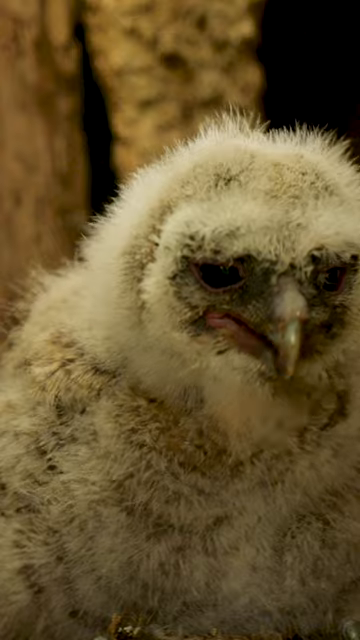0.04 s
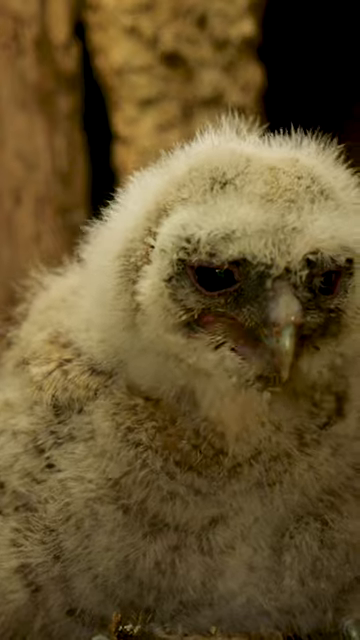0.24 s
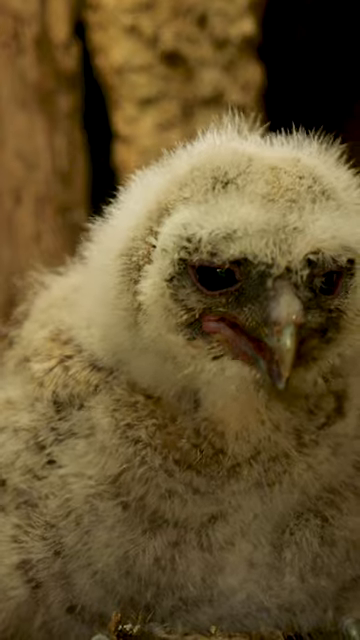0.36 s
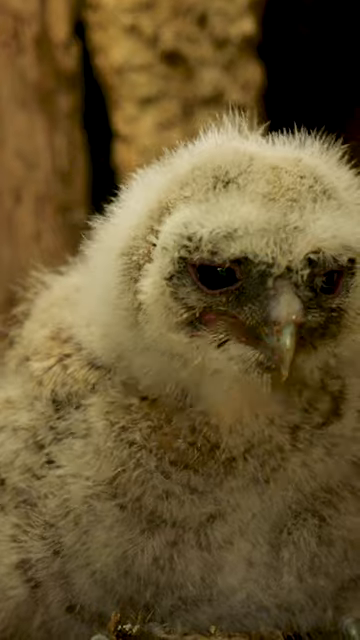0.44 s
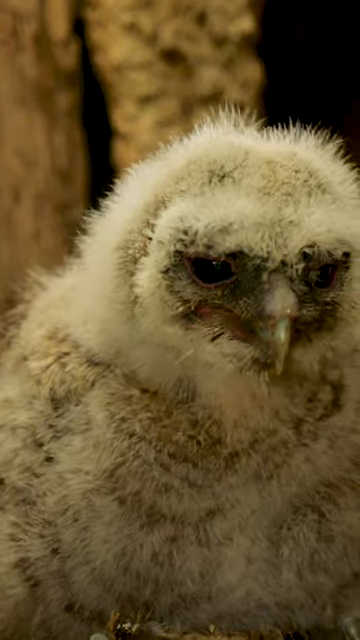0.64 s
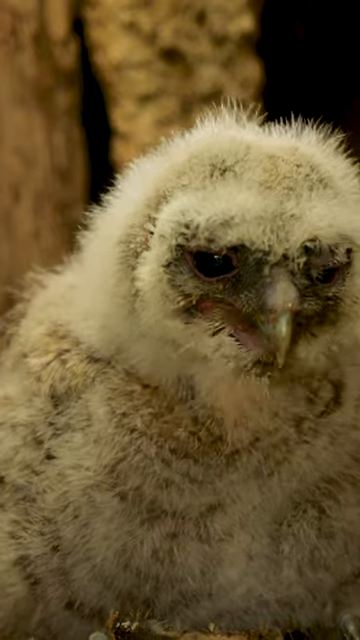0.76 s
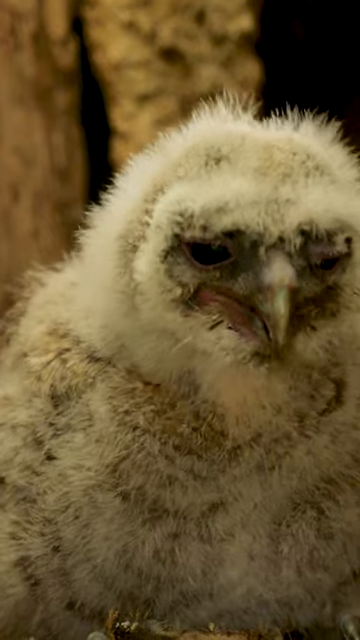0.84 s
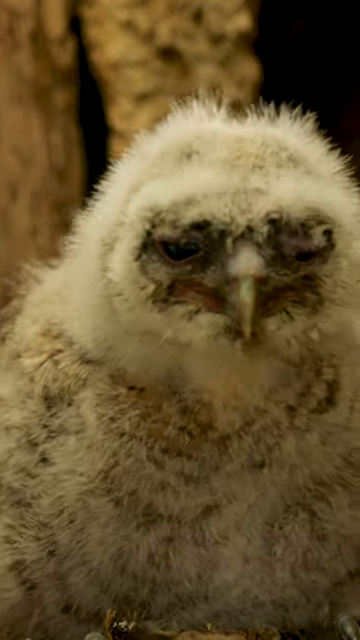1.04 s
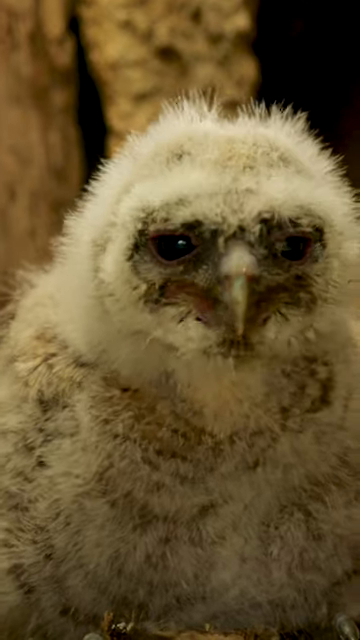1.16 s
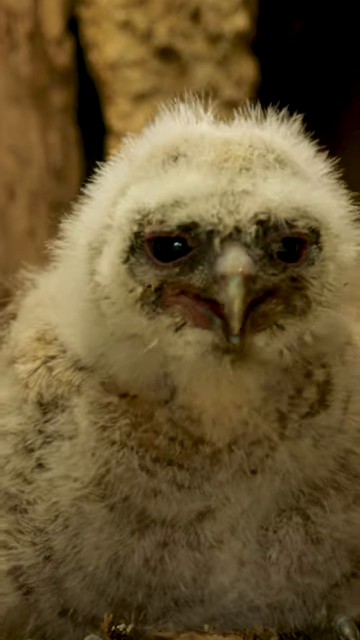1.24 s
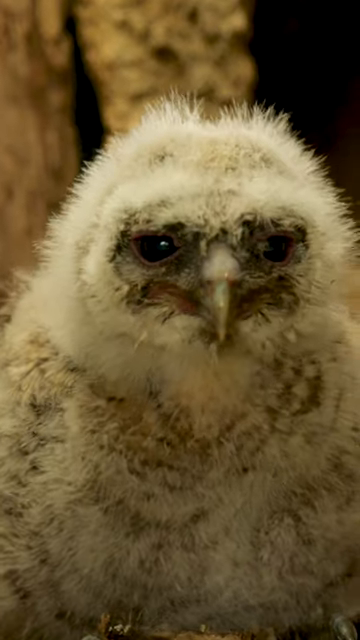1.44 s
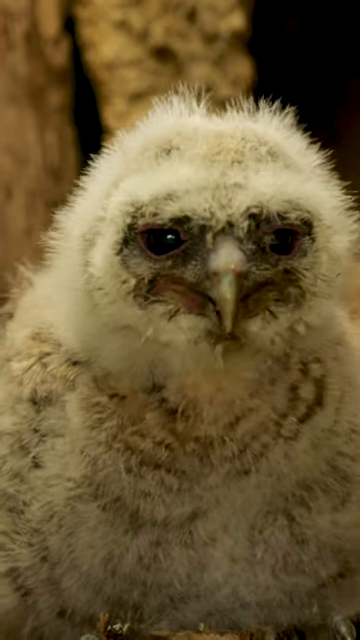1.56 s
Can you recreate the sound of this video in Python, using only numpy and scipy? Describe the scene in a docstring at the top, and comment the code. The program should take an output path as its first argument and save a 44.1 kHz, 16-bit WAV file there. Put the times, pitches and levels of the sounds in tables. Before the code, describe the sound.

Sharp beak clicks from a young owl, with soft shuffling in a quiet room.

```python
"""On a wooden perch in a quiet room, an owlet snaps its beak, heard from close by.
Each snap is an impact: the bill tips ping, the horny edges crack, and bill and mouth resonate briefly.
Between snaps the mouth smacks open. Bumps and stick-slip friction excite the modes of the perch,
with small ticks, low thuds and rustling feathers, over faint room noise, hiss and a low rumble."""
import sys
import numpy as np
from scipy import signal
from scipy.fft import rfft, irfft
from scipy.io import wavfile
from scipy.ndimage import uniform_filter1d

SR = 44100
rng = np.random.default_rng(int(sys.argv[2]) if len(sys.argv) > 2 else 0)


def bounce(signal):
    """Save signal as a 16-bit WAV file at the path given by the first command-line argument."""
    frames = np.transpose(np.atleast_2d(signal))
    limited = np.clip(frames, -1, 1)
    pcm = np.round(limited * 32767).astype(np.int16)
    wavfile.write(sys.argv[1], SR, pcm)


N = 70560
T = np.arange(N) / SR

# beak snaps: start_s, level_db, crack_offset_db, hollow_offset_db
SNAPS = [(0.0982, -6, -1.5, 2.5), (.3852, 0, 0.5, 0.5), (0.4326, -1.5, -.5, 0), (1.0188, -2, 0.5, 2.5),
         (1.0555, -14, -1, 7.5)]
# modes of the bill tips: pitch_hz, level_db, t60_s
TIP_MODES = [(3670, -24, 0.01), (3990, -33.5, .014), (3540, -49, 0.016)]
# hollow modes of bill and mouth: pitch_hz, level_db, t60_s
MOUTH_MODES = [(542.5, -39, 0.074), (779, -37, 0.076), (986, -39, 0.12), (1218, -37.5, 0.081),
               (1393, -31.5, 0.047), (1920, -30.5, 0.036), (2160, -28, .033), (2470, -38, 0.058)]
# crack of the horny edges: frequency_hz, density_db
CRACK_SPECTRUM = [(150, 0), (700, 4), (1500, 0), (2900, 5), (3600, 0), (4400, 4), (5600, -2), (8500, -5),
                  (9600, -8), (10300, 8), (11000, 1), (13000, -0.5), (15500, -2)]
# its duller echo off nearby wood: frequency_hz, density_db
ECHO_SPECTRUM = [(100, -3), (400, 6), (1400, 3.5), (2900, -14), (3700, -2.5), (5600, -12), (10500, -11.5),
                 (15500, -20)]
def beak_snaps(crack_lag_s=0.000798, crack_rise_s=0.00061, mouth_lag_s=0.001147):
    """Impact excitation: the tips ping, the edges crack, and the mouth cavity resonates just after."""
    out = np.zeros(N)
    crack_grain, echo_grain = noise(CRACK_SPECTRUM), noise(ECHO_SPECTRUM)
    for start, db, crack_db, hollow_db in SNAPS:
        ping = ring(TIP_MODES, start, rise_s=0.00044)
        shut = start + crack_lag_s
        shift = int(shut * SR)  # every snap has the same grain
        crack = strike(shut, crack_rise_s, t60_s=0.011) * np.roll(crack_grain, shift)
        echo = undb(-10) * strike(shut, crack_rise_s, t60_s=0.088) * np.roll(echo_grain, shift)
        hollow = undb(hollow_db) * ring(MOUTH_MODES, start + mouth_lag_s, rise_s=0.0027)
        out += undb(db) * (ping + undb(crack_db - 26) * (crack + echo) + hollow)
    return out


# wet smacks: start_s, level_db
SMACKS = [(.8578, 1), (.9374, -16.5)]
# modes of the opening mouth: pitch_hz, level_db, t60_s
SMACK_MODES = [(640, -35, 0.056), (730, -26.5, 0.037), (1330, -24.5, 0.033), (1610, -25, 0.021),
               (1880, -24, 0.013), (2390, -20, 0.016), (2710, -28, 0.023), (3990, -31, .014),
               (5300, -46, 0.0082)]
# spray of spit: frequency_hz, density_db
SPIT_SPECTRUM = [(100, -15), (400, 6.5), (1500, -2), (5200, -5), (7000, -18), (11000, -17), (15500, -28)]
def mouth_smacks(rise_s=0.0012):
    """Cavity resonance: the mouth pops open and rings, with a noise burst of spit."""
    out = np.zeros(N)
    spray = undb(-28) * noise(SPIT_SPECTRUM)
    for start, db in SMACKS:
        spit = spray * strike(start, rise_s / 2, t60_s=0.023)
        out += undb(db) * (ring(SMACK_MODES, start, rise_s) + spit)
    return highpass(out, 260)


# soft blows on the perch: start_s, level_db, contact_s
BUMPS = [(0.236, -18, 0.00244), (0.2899, -17, 0.0017), (1.176, -33, 0.0014), (1.2227, -26, 0.00086),
         (1.2506, -10.5, 0.00071)]
# modes of the wood: pitch_hz, level_db, t60_s
PERCH_MODES = [(115, -33, 0.14), (274.6, -16.5, 0.081), (391, -6, 0.054), (577, -11.5, 0.022),
               (657, -9.5, 0.036), (873.3, -8, 0.067), (907, -9.5, 0.056), (1155, -13.5, 0.064),
               (1507, -18.5, 0.063)]
PERCH_CUTOFF_HZ = 133  # bumps and scrapes on the wood are thinned out below this
def perch_bumps():
    """Forced response: a force pulse drives the wood's modes; longer contact gives a duller knock."""
    out = np.zeros(N)
    age = T[:N // 50]
    for start, db, contact_s in BUMPS:
        force = age * np.exp(-2 * np.pi * age / contact_s)
        wood = ring(PERCH_MODES, start, rise_s=0.0023)
        out += undb(db) * signal.fftconvolve(wood, force / force.sum())[:N]
    return highpass(out, PERCH_CUTOFF_HZ)


# low thuds: start_s, level_db, pitch_hz, t60_s
THUDS = [(.226, -36.5, 114, 0.14), (.290, -42, 126, 0.15), (0.387, -36, 116.4, 0.13),
         (1.05, -22.5, 250.4, 0.051), (1.098, -35, 233, 0.095), (1.15, -36.5, 220, 0.16),
         (1.175, -27.5, 290, 0.09), (1.213, -29, 136, 0.14), (1.296, -34, 100.5, 0.25)]
def weight_thuds():
    """Damped oscillation: each shift of the bird's weight excites one low mode."""
    return sum(ring([(hz, db, t60)], start, rise_s=0.0082) for start, db, hz, t60 in THUDS)


# dry ticks: start_s, level_db, centre_hz
TICKS = [(0.673, -40, 850), (1.142, -50, 3000), (1.2815, -40, 2400), (1.2935, -44, 13100)]
def ticks():
    """Broadband transients: brief contacts of claws and down give bursts of noise."""
    out = np.zeros(N)
    for start, db, hz in TICKS:
        band = noise([(hz / 4, -16), (hz, 0), (hz * 4, -32)])
        out += undb(db) * strike(start, rise_s=0.00075, t60_s=0.023) * band
    return out


# dragging movements: start_s, rise_s, hold_s, release_s, level_db
SHUFFLES = [(0.209, 0.023, 0.011, 0.019, -49), (0.253, .02, 0.027, 0.018, -52.5),
            (1.085, 0.029, 0.049, 0.039, -47.5), (1.172, .042, .045, 0.027, -34),
            (1.269, 0.018, 0.011, 0.022, -48)]
# scraping on wood: frequency_hz, density_db
SCRAPE_SPECTRUM = [(30, -14), (70, -23), (130, 1.5), (200, -14), (300, -9.5), (800, 2), (1050, -11),
                   (1550, -14), (2000, -19.5), (3500, -29), (6000, -40), (15500, -50)]
def shuffles(rate_hz=1800):
    """Stick-slip friction: feet and feathers catch on the perch, scraping it and ringing its modes."""
    effort = np.zeros(N)
    for start, rise, hold, release, db in SHUFFLES:
        corners_s = start + np.cumsum([0, rise, hold, release])
        effort += undb(db) * np.interp(T, corners_s, [0, 1, 1, 0])
    impulse_response = highpass(ring(PERCH_MODES, 0, 0), PERCH_CUTOFF_HZ)
    wood = unit_rms(signal.fftconvolve(catches(rate_hz), impulse_response)[:N])
    scrape = colour(catches(rate_hz), SCRAPE_SPECTRUM)
    return effort * (wood + scrape)


# one wing stroke: centre_s, half_length_s, level_db
WING_STROKE = (1.235, 0.027, -43)
# feather over feather: frequency_hz, density_db
WING_SPECTRUM = [(400, -9), (1150, -9), (1300, -9), (1530, 7), (1800, -10), (2300, -2), (3200, -12.5),
                 (5500, -13.5), (9000, -27), (15500, -33)]
def wing_brush():
    """Sliding friction: a wing brushes the body during the biggest shuffle."""
    centre_s, half_s, db = WING_STROKE
    swell = undb(db) * np.exp(-((T - centre_s) / half_s) ** 2)
    return swell * colour(catches(rate_hz=3600), WING_SPECTRUM)


# course of the rustle: time_s, level_db
RUSTLE_LEVELS = [(.06, -58), (.25, -51.5), (.42, -49.5), (.58, -46.5), (.72, -51), (.88, -50.5), (1.0, -47),
                 (1.15, -53.5), (1.29, -52), (1.36, -59), (1.6, -53)]
# soft down: frequency_hz, density_db
DOWN_SPECTRUM = [(120, -9.5), (260, -1), (340, 7), (450, -4.5), (700, -4), (1300, -7.5), (2800, -17.5),
                 (5000, -15.5), (8000, -25.5), (15500, -31)]
def down_rustle():
    """Fibre friction: countless tiny slips merge into a rustle as the bird stirs."""
    return gain_curve(RUSTLE_LEVELS) * colour(catches(rate_hz=5000, spread_db=4), DOWN_SPECTRUM)


# room noise and hiss: frequency_hz, density_db
ROOM_SPECTRUM = [(15, -11), (25, -19.5), (82, -0.5), (152, -5.5), (228, -8.5), (449, -4.5), (710, -7.5),
                 (905, -11.5), (1090, -12), (1280, -11.5), (1390, -14), (1550, -13.5), (2260, -17),
                 (3680, -20.5), (7220, -26), (13100, -27.5), (15800, -34)]
def room_noise(level_db=-48.5, waver_db=1.07):
    """Amplitude modulation: broadband noise wavers slightly and at random."""
    drift = uniform_filter1d(rng.standard_normal(N), size=2000)
    waver = unit_rms(uniform_filter1d(drift, size=2000))
    return undb(level_db + waver_db * waver) * noise(ROOM_SPECTRUM)


# course of the rumble: time_s, level_db
RUMBLE_LEVELS = [(.06, -55), (.7, -91), (1.3, -61), (1.4, -49.5), (1.52, -51), (1.6, -48.5)]
# its bass band: frequency_hz, density_db
RUMBLE_SPECTRUM = [(20, -80), (40, -10), (68, 1.5), (130, -2), (220, -9.5), (800, -60)]
def rumble():
    """Band-limited noise: a low rumble fades away, then grows at the end."""
    return gain_curve(RUMBLE_LEVELS) * noise(RUMBLE_SPECTRUM)


def strike(start_s, rise_s, t60_s):
    """Exponential damping: the envelope of a blow rises quickly, then falls 60 dB in t60_s."""
    age = np.maximum(T - start_s, 0)
    attack = 1 - np.exp(-age / max(rise_s, 1e-5))
    return attack * np.exp(-np.log(1000) * age / t60_s)


def ring(modes, start_s, rise_s):
    """Modal superposition: damped sinusoids set off at one moment."""
    return sum(undb(db) * strike(start_s, rise_s, t60) * np.sin(2 * np.pi * hz * (T - start_s))
               for hz, db, t60 in modes)


def catches(rate_hz, spread_db=0.5):
    """Poisson process: fibres catch and slip at random, in clicks of uneven size."""
    clicks = (rng.random(N) < rate_hz / SR) * rng.choice([-1, 1], N)
    return clicks * undb(spread_db * rng.standard_normal(N))


def colour(x, spectrum):
    """Spectral shaping: filter by a curve of (Hz, dB) points, then scale to rms 1."""
    hz, db = np.array(spectrum, float).T
    bins_hz = np.maximum(np.arange(N // 2 + 1) * SR / N, 1)
    gain = undb(np.interp(np.log(bins_hz), np.log(hz), db))
    return unit_rms(irfft(rfft(x) * gain, N))


def noise(spectrum):
    """Gaussian noise with the given spectrum."""
    return colour(rng.standard_normal(N), spectrum)


def highpass(x, hz):
    """Second-order attenuation of the bass below hz."""
    return signal.sosfilt(signal.butter(2, hz, "highpass", fs=SR, output="sos"), x)


def gain_curve(levels):
    """Interpolation of (s, dB) points into an amplitude envelope."""
    return undb(np.interp(T, *np.array(levels).T))


def undb(db):
    """Decibels to amplitude ratio."""
    return 10 ** (np.asarray(db) / 20)


def unit_rms(x):
    """Normalisation to rms 1."""
    return x / np.sqrt(np.mean(x ** 2))


def scene():
    """Linear superposition: bird, perch and room add in one channel."""
    mouth = beak_snaps() + mouth_smacks()
    movement = perch_bumps() + weight_thuds() + ticks() + shuffles() + down_rustle()
    return (mouth + movement + room_noise() + rumble() + wing_brush())[None]


def record(dry, silence_s=0.057, cutoff_hz=15900):
    """Gating and band limiting: a moment of silence, then the sound through a steep low-pass."""
    lowpass = signal.ellip(10, .2, 70, cutoff_hz, fs=SR, output="sos")
    return signal.sosfilt(lowpass, dry * (T >= silence_s))


dry = scene()
out = record(dry)
bounce(out)
```